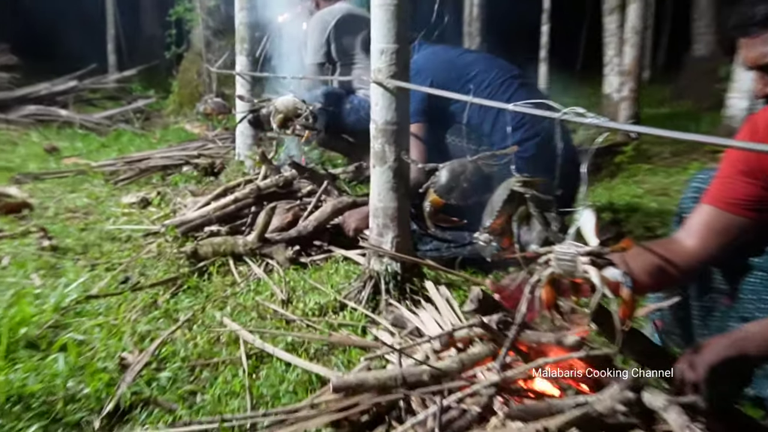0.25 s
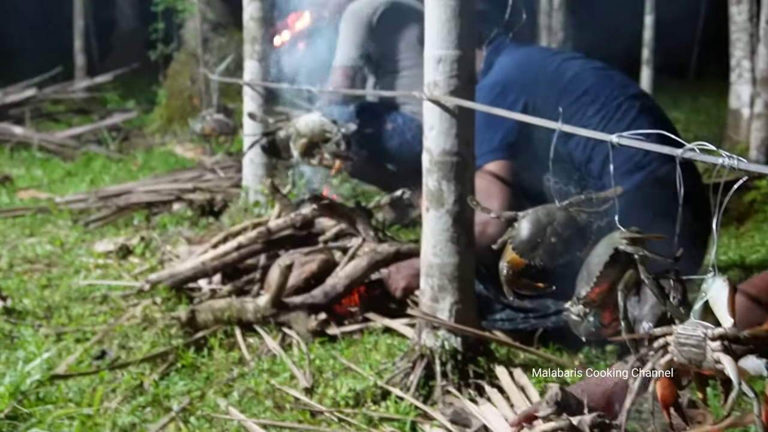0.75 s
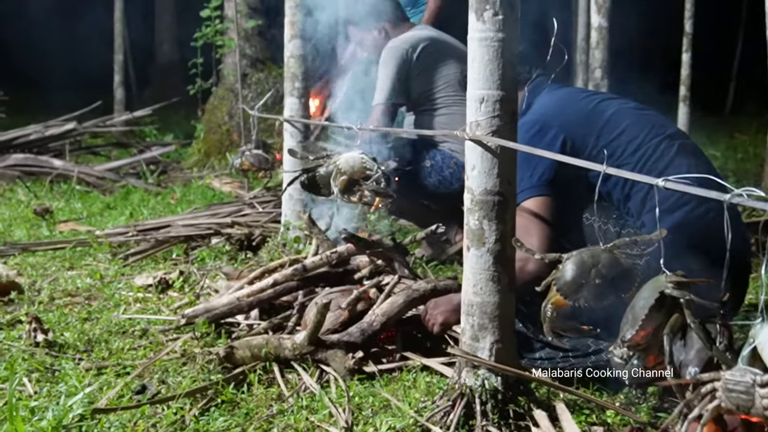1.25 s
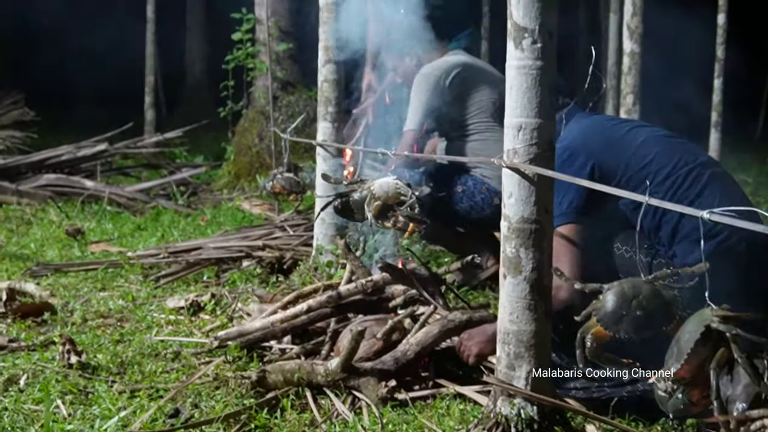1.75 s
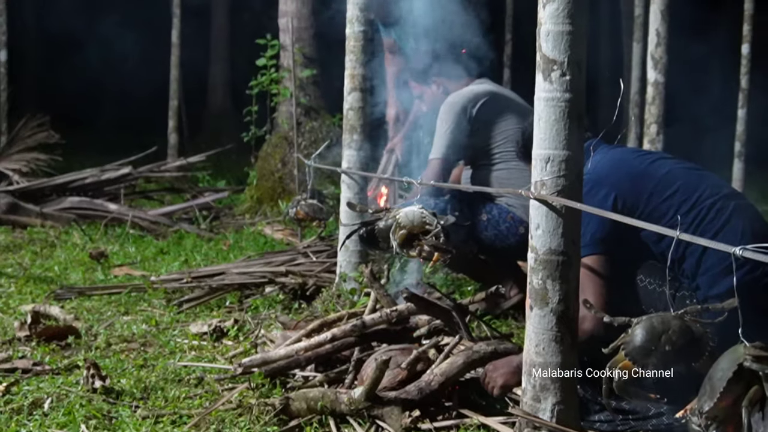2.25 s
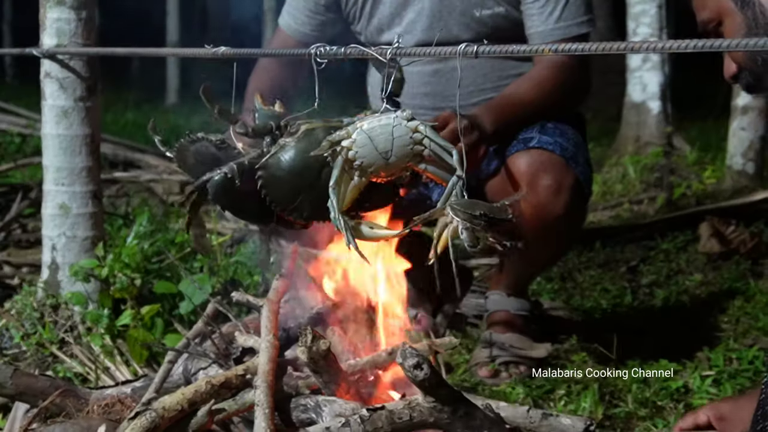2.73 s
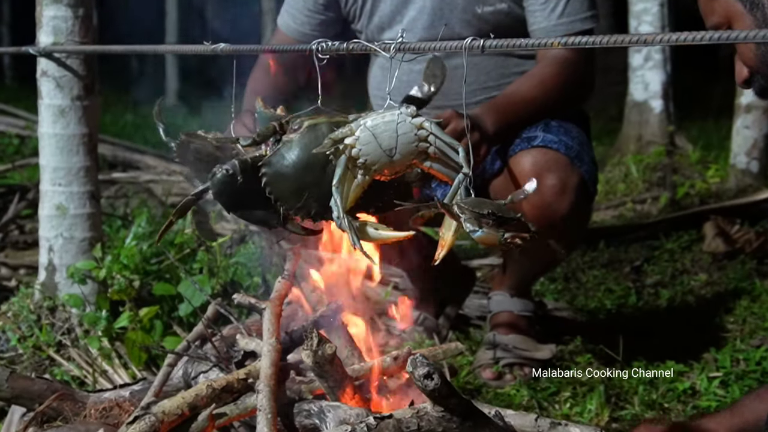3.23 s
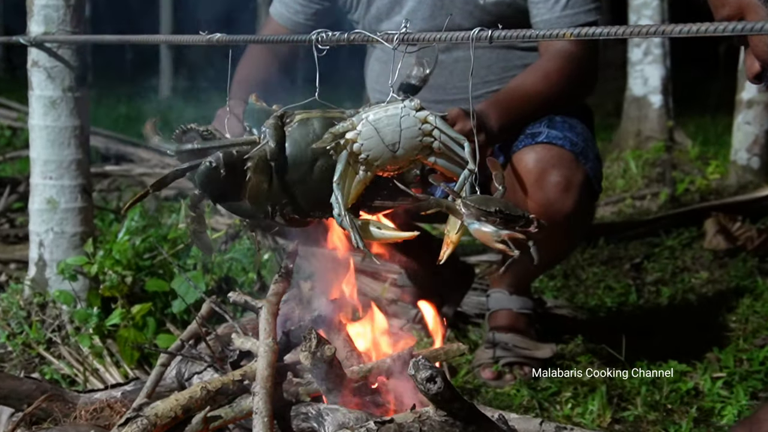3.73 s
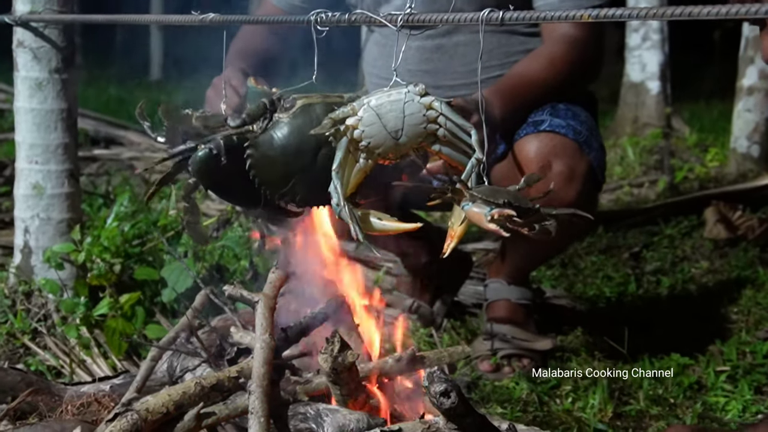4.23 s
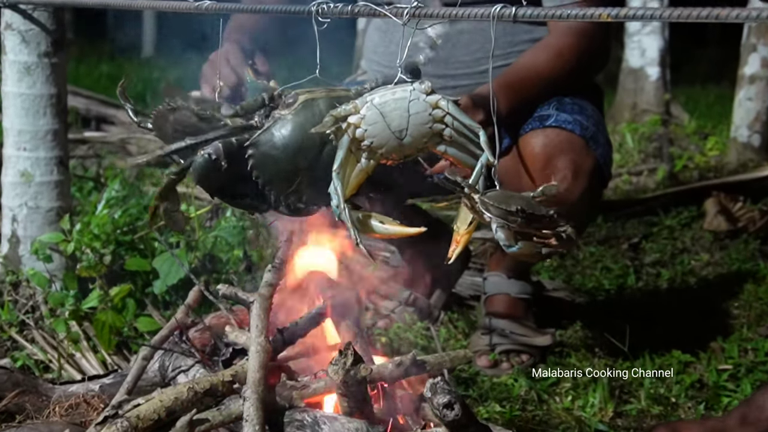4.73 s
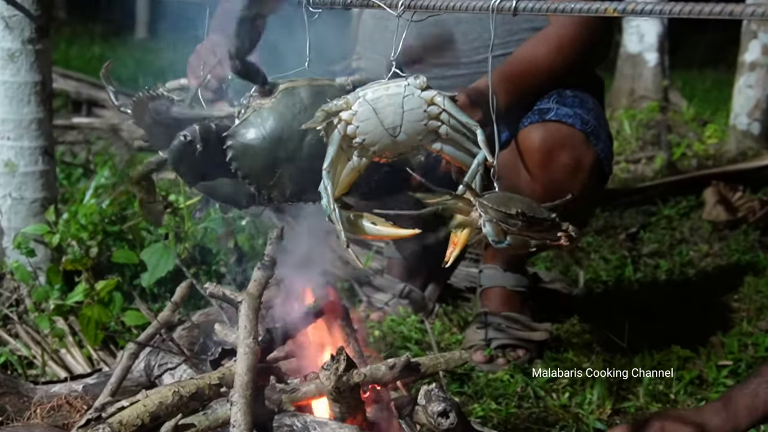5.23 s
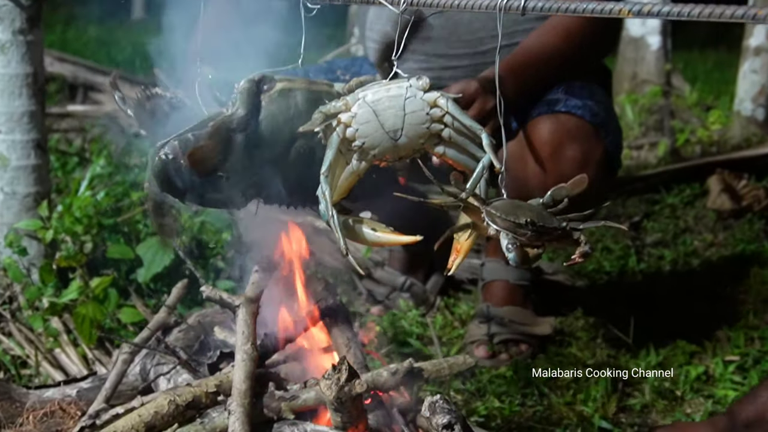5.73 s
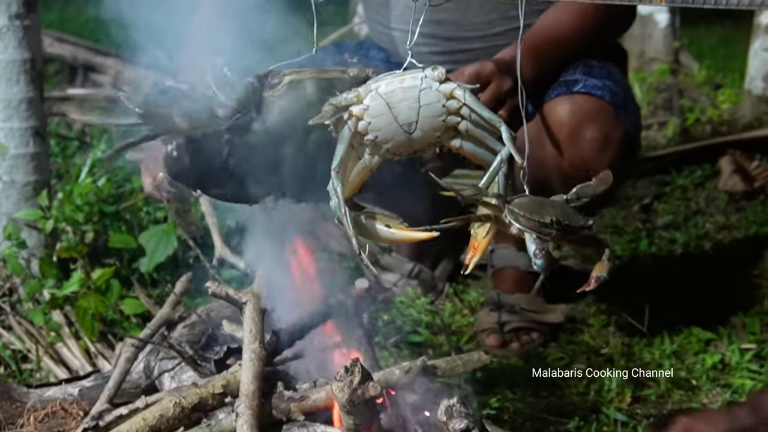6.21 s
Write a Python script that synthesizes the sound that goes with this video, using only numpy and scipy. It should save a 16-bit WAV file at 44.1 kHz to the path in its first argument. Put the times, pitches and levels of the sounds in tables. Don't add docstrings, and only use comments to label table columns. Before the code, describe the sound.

A small fire of sticks and dry fronds burns close to a stereo microphone, outdoors at night. From 0 to 0.7 s a hand rubs the casing with low, woody creaks, as small pops begin and a knock and snap follow around 0.6. Frond rustle continues unevenly; from 1.2 to 2.1 s crackling thickens into crunches, stick knocks, bright ticks and hard snaps, with a crunch at 1.55 and sharp cracks near 2.0. A brief sap hiss comes at 2.26, and soft wheezes near 3.4 in a sparser stretch. Snaps return at 4.2, with the loudest crack at 4.64, then knocks and another big snap at 5.39, thinning towards 6.4. A faint flame rumble stays beneath. Throughout, high crickets trill together, dipping roughly every 0.6 s; a thin bush cricket buzz recurs at that pace. Frogs chirp falling whistles early, at 2.4 and after 5, over a faint distant frog chorus.

```python
import sys
import numpy as np
from scipy import signal
from scipy.fft import rfft, irfft, next_fast_len
from scipy.io import wavfile
from scipy.ndimage import uniform_filter1d

SR = 44100
rng = np.random.default_rng(int(sys.argv[2]) if len(sys.argv) > 2 else 0)


def output_pcm(signal):
    pcm = np.clip(np.atleast_2d(signal).T, -1, 1) * 32767
    wavfile.write(sys.argv[1], SR, np.round(pcm).astype(np.int16))


def boost_factor(decibels):
    exponent = np.asarray(decibels, float) / 20
    return 10 ** exponent


N = 285327
T = np.arange(N) / SR
PORT_LAG = 0.44


def rms_one(x):
    return x / np.sqrt(np.mean(x ** 2) + 1e-20)


def peak_one(x):
    return x / np.abs(x).max()


def in_time(rows):
    s, *columns = np.transpose(rows)
    return [np.interp(T, s, c) for c in columns]


def drift(rate):
    knots = rng.standard_normal(400)
    return rms_one(uniform_filter1d(np.interp(T * rate, np.arange(400), knots), size=200))


def colour(x, spectrum):
    size = next_fast_len(N)
    hz, db = np.transpose(spectrum)
    bins_hz = np.arange(4097) * SR / 8192
    gain = boost_factor(np.interp(np.log(bins_hz + 1), np.log(hz), db))
    cepstrum = irfft(np.log(gain))
    cepstrum[1:4096] *= 2
    cepstrum[4097:] = 0
    response = irfft(np.exp(rfft(cepstrum)))
    return rms_one(irfft(rfft(x, size) * rfft(response, size), size)[..., :N])


def band(x, low_hz, high_hz, order=2):
    return signal.lfilter(*signal.butter(order, [low_hz, min(high_hz, .45 * SR)], "band", fs=SR), x)


def pan(db):
    return boost_factor(np.array([[db / 2], [-db / 2]]))


def spread(mid, side, side_db, pan_db=0):
    return (mid + boost_factor(side_db) * side * [[1], [-1]]) * pan(pan_db)


def add(out, s, sound, pan_db=0, lag=0):
    i = max(round(s * SR), 0)
    pair = sound + lag * np.gradient(sound) * [[1], [-1]]
    out[:, i:i + len(sound)] += pair[:, :N - i] * pan(pan_db)


def grains(per_s, size_db):
    sizes = boost_factor(size_db * np.minimum(rng.exponential(1, (2, N)), 5))
    sizes = sizes * rng.choice([-1, 1], (2, N))
    return rms_one(sizes * (rng.random((2, N)) < per_s / SR))


def far_insects():
    # f/Hz, density/dB per Hz
    night_spectrum = [(6500, -16), (7600, -1.5), (8100, -4), (8800, 5.5), (9900, -2), (11000, -15),
                      (13000, -12.5), (15000, -15), (15900, -48)]
    noise = spread(*rng.standard_normal((2, N)), side_db=-1.0, pan_db=0.5)
    return boost_factor(-44 + 1.6 * drift(9.0)) * colour(noise, night_spectrum)


def chorus_db():
    # rest begins t/s, song returns t/s, depth/dB
    rests = [
        (0.375, 0.527, 4.5),
        (1.093, 1.24, 7),
        (1.773, 1.89, 8.5),
        (2.393, 2.496, 9.5),
        (3.13, 3.23, 7),
        (3.747, 3.857, 6.5),
        (4.366, 4.52, 6.5),
        (4.977, 5.12, 9.5),
        (5.527, 5.678, 7.5),
        (6.096, 6.242, 7),
    ]
    fade_s, return_s = 0.077, .035
    dips = []
    for begin, end, depth_db in rests:
        depth = np.minimum((T - begin) / fade_s, (end - T) / return_s + .5)
        dips.append(depth_db * np.clip(depth, 0, 1))
    return -30.0 - sum(dips)


def crickets(count=4):
    # f/Hz, density/dB per Hz
    wing_spectrum = [(3120, -25), (5300, -18), (5520, -32.5), (5890, 0), (6070, 5), (6500, 7.5), (6880, 2),
                     (7240, -6.5), (7900, -34.5), (10300, -25.5), (17400, -120)]
    near, teeth = np.zeros((2, N)), round(SR / 35)
    for k, pan_db in enumerate(np.linspace(-9.0, 5.0, count)):
        groups_hz = (35.0 + .3 * k) * (1 + .0006 * drift(2.0))
        cycles = np.cumsum(groups_hz) / SR + rng.random()
        tooth = (cycles % 1 * teeth).astype(int)
        file = rng.standard_normal(teeth)[tooth] + .8 * rng.standard_normal(N)
        stroke = np.exp(-3.0 * (7 * cycles % 1))
        throb = 0.43 + np.exp(-4.0 * (cycles % 1))
        near += boost_factor(-2.5 * k) * file * stroke * throb * pan(pan_db)
    far = spread(*rng.standard_normal((2, N)), side_db=-3.0, pan_db=-1.0)
    chorus = colour(rms_one(near) + boost_factor(0.5) * far, wing_spectrum)
    wing_note = rms_one(band(chorus, 6620, 6760))
    return boost_factor(chorus_db() + 2.0) * (chorus + boost_factor(-11.0) * wing_note)


def bush_cricket():
    # t/s, length/s, level/dB, wing resonance f/Hz
    bursts = [
        (.08, .2, -51, 9300),
        (.75, .14, -52, 10000),
        (1.38, .13, -46, 9900),
        (2.03, .13, -48, 9900),
        (2.65, .13, -45, 9900),
        (3.17, .19, -48, 9700),
        (3.81, .19, -47, 9700),
        (4.51, .13, -48, 10100),
        (5.15, .18, -48, 9700),
        (5.79, .19, -49, 9400),
    ]
    out = np.zeros((2, N))
    for s, length, db, hz in bursts:
        t = np.arange(round(length * SR)) / SR
        lines = 352.1 * np.arange(23, 35)[:, None]
        gains = boost_factor(-11.0 * np.abs(lines - hz) / 1000 + rng.normal(0, 2.5, (12, 1)))
        flicker = np.cos(2 * np.pi * (rng.uniform(2, 7, (12, 1)) * t + rng.random((12, 1))))
        waves = np.cos(2 * np.pi * lines * t + rng.normal(0, .6, (12, 1)))
        buzz = np.sum(gains * (.3 + flicker) * waves, axis=0)
        add(out, s, boost_factor(db) * rms_one(buzz) * np.sin(np.pi * t / length) ** .7, pan_db=3.0)
    return out


def chirp(length, start_hz, drop_hz):
    t = np.arange(round(length * SR)) / SR
    hz = start_hz - drop_hz * (1 - (1 - t / length) ** 1.24)
    return np.sin(2 * np.pi * np.cumsum(hz) / SR) * np.sin(np.pi * t / length)


def frogs():
    # t/s, peak level/dB
    calls = [(0.104, -33), (.344, -34), (.54, -41), (1.013, -31), (1.258, -37), (2.431, -35), (5.023, -35),
             (5.075, -29), (5.318, -37), (5.364, -33), (5.631, -38), (5.684, -27)]
    # t/s, level/dB
    far_calls = [
        (0, -48.5),
        (1.5, -44.5),
        (2.8, -50),
        (3.3, -49),
        (3.75, -48.5),
        (4.2, -51),
        (4.9, -50.5),
        (5.8, -44.5),
        (6.47, -52),
    ]
    near = np.zeros((2, N))
    for s, db in calls:
        add(near, s, boost_factor(db) * chirp(0.042, 3480, 520), pan_db=-5.5)
        add(near, s + 0.026, boost_factor(db - 13.5) * chirp(0.0426, 3350, 294), pan_db=7.0)
    starts = spread(*grains(260.0, 0.34), side_db=-7.0)
    far = signal.fftconvolve(starts, chirp(0.0289, 3400, 441)[None])[:, :N]
    return near + boost_factor(in_time(far_calls)[0]) * rms_one(far)


def casing_creaks():
    # t/s, level/dB
    rubbing = [
        (0, -39),
        (.15, -62),
        (.18, -29.5),
        (.26, -45.5),
        (.35, -37.5),
        (.53, -39),
        (.61, -32.5),
        (.645, -40),
        (.69, -43),
    ]
    # f/Hz, width/Hz, level/dB
    resonances = [
        (217, 35, 3.5),
        (391, 73, 6.5),
        (654, 45, -9),
        (1130, 610, -35),
    ]
    # t/s, peak level/dB, f/Hz
    creaks = [(0.019, -27, 390), (0.133, -35.5, 590), (0.175, -24, 218), (0.237, -33, 384),
              (0.293, -33, 401), (0.346, -31, 191), (0.372, -28, 191), (0.392, -36, 357), (0.439, -30, 191),
              (0.497, -30, 393), (0.546, -30, 193), (0.552, -24.5, 497), (0.601, -25, 192),
              (0.621, -19.5, 454)]
    slips = grains(320.0, size_db=3.0)[0]
    modes = [boost_factor(db) * rms_one(band(slips, hz - width / 2, hz + width / 2, order=1))
             for hz, width, db in resonances]
    rub_gain = boost_factor(in_time(rubbing)[0] - 10.5) * (T < rubbing[-1][0])
    out = rub_gain * spread(sum(modes), np.roll(modes[1], 25), side_db=-6.5)
    t = np.arange(3000) / SR
    swell = t / 0.0019 * np.exp(1 - t / 0.0027)
    for s, db, hz in creaks:
        tone = np.sin(2 * np.pi * hz * t) + 0.17 * np.sin(2 * np.pi * 1.85 * hz * t)
        add(out, s, boost_factor(db - 4.0) * swell * tone, pan_db=1.0)
    return out


def flame():
    # f/Hz, density/dB per Hz
    flame_spectrum = [(15, -62), (25, -16), (54, 2.5), (102, 4.5), (158, 5), (361, -11.5), (494, -30),
                      (687, -20), (823, -18), (900, -26), (1170, -41), (1980, -120)]
    flicker_db = .6 * drift(6.0)
    noise = spread(*rng.standard_normal((2, N)), side_db=-70.0)
    rumble = boost_factor(-45.5 + flicker_db) * colour(noise, flame_spectrum)
    distant = rms_one(band(rng.standard_normal(N), 150, 440, order=3))
    return rumble + boost_factor(-65.5) * distant * [[1], [-1]]


def rustle():
    # t/s, level/dB
    vigour = [(0, -37.5), (.35, -33.5), (.5, -39.5), (.8, -31.5), (1.0, -39.5), (1.55, -35), (1.8, -28.5),
              (2.2, -34), (2.55, -31.5), (2.97, -41.5), (4.03, -44.5), (4.3, -34.5), (4.75, -42.5),
              (5.32, -39), (5.58, -37.5), (6.0, -38), (6.25, -41.5), (6.47, -42)]
    # t/s, level/dB
    embers = [(0.0, -53), (0.2, -58), (0.36, -51), (0.49, -47), (0.9, -58.5), (1.13, -58), (1.75, -51),
              (1.89, -43.5), (2.2, -55), (2.54, -46.5), (3.17, -60), (3.48, -51.5), (3.98, -64),
              (4.4, -54.5), (4.81, -47.5), (5.15, -54.5), (5.89, -49.5), (6.47, -55)]
    # f/Hz, density/dB per Hz
    frond_spectrum = [(500, -2), (1000, -4.5), (2000, -0.5), (3500, 2.5), (5500, 2), (8000, -2),
                      (11000, -6.5), (15500, -34)]
    body_db, = in_time(vigour)
    low_db = in_time(embers)[0] + 0.5 * drift(9.0)
    clicks = grains(1500.0 * boost_factor(6.0 * drift(40.0)), size_db=3.0)
    hiss = boost_factor(-15.5) * rng.standard_normal((2, N))
    dealt = rng.integers(0, 8, N)
    rings = []
    for k, hz in enumerate(650 * 1.55 ** np.arange(8)):
        ring = band(clicks * (dealt == k) + hiss, 0.68 * hz, 1.8 * hz, order=1)
        rings.append(ring * boost_factor(3.5 * drift(12.0)) / np.sqrt(hz))
    low = rms_one(sum(rings[:2]))
    body = colour(sum(rings[2:]), frond_spectrum)
    both = boost_factor(body_db - 1.0) * body + boost_factor(low_db + 1.36) * low
    return spread(*both, side_db=-23.0, pan_db=-1.0)


def crunches():
    # t/s, rise/s, fall/s, level/dB, centre f/Hz
    collapses = [(0.662, 0.023, 0.012, -25.5, 3400), (1.325, 0.012, 0.013, -25, 2340),
                 (1.391, 0.0027, 0.017, -21, 2960), (1.557, 0.018, 0.0093, -13.5, 2800),
                 (1.889, 0.0041, 0.021, -21, 3020), (2.91, 0.0044, 0.034, -30, 2800),
                 (4.489, 0.0061, 0.0091, -25.5, 2670), (4.639, 0.011, 0.008, -16, 2900),
                 (5.051, 0.02, 0.012, -31, 3450), (5.505, 0.026, 0.01, -23.5, 2290),
                 (6.143, 0.05, 0.02, -35.5, 1990), (1.555, 0.026, 0.022, -31.5, 530),
                 (1.35, 0.052, 0.044, -45.5, 400), (2.961, 0.063, 0.054, -48, 560),
                 (4.64, 0.0092, 0.022, -40.5, 199)]
    # t/s, rise/s, fall/s, level/dB, centre f/Hz
    wheezes = [
        (.625, 0.015, 0.014, -34, 756),
        (2.262, 0.017, 0.021, -26, 4200),
        (2.262, 0.023, 0.027, -39, 1200),
        (3.29, 0.013, 0.05, -41, 1820),
        (3.403, 0.0023, .028, -28.5, 1950),
        (3.41, .004, 0.034, -36, 3150),
        (3.41, 0.0057, 0.082, -45.5, 880),
        (3.435, 0.014, 0.033, -34, 1840),
        (6.14, 0.033, 0.0095, -37.5, 690),
    ]
    out, t = np.zeros((2, N)), np.arange(-4000, 8000) / SR
    splinters = grains(5000.0, size_db=2.2)[0]
    rows = [(*row, 2.08) for row in collapses] + [(*row, 0.37) for row in wheezes]
    for k, (s, rise, fall, db, hz, octaves) in enumerate(rows):
        piece = np.roll(splinters, -k * len(t))[:len(t)]
        half = 2 ** (octaves / 2)
        sound = rms_one(band(piece, hz / half, hz * half))
        sound += boost_factor(-42.0) * rms_one(band(piece, 4100, 18000))
        swell = np.exp(np.where(t < 0, t / rise, -t / fall))
        add(out, s + t[0], boost_factor(db) * sound * swell, pan_db=0.6)
    return out


def knocks():
    # t/s, peak level/dB, ring f/Hz
    stick_knocks = [(0.716, -18, 1800), (1.229, -25, 1680), (1.312, -14.5, 1310), (1.391, -27, 1110),
                    (1.541, -17.5, 1170), (1.811, -12, 1900), (1.837, -17, 1330), (1.869, -13.5, 1830),
                    (1.886, -20, 1680), (2.108, -32, 1720), (3.145, -19, 1930), (0.622, -7.5, 1940),
                    (3.797, -22, 1600), (4.076, -22.5, 1850), (4.484, -37, 1490), (0.5553, -12.5, 2160),
                    (4.639, -36, 1540), (4.709, -18, 1390), (4.922, -13.5, 1450), (4.951, -17, 1580),
                    (5.015, -19.5, 1690), (5.016, -22, 1050), (5.06, -16, 1570), (5.118, -11.5, 2020),
                    (5.252, -25.5, 1060), (5.392, -7, 1190), (5.422, -13.5, 1510), (5.475, -12, 1360),
                    (6.013, -18.5, 1060), (6.068, -18, 1800)]
    # t/s, peak level/dB, ring f/Hz
    hollow_thuds = [(1.329, -28, 940), (1.37, -42, 1200), (1.526, -29, 1090), (1.612, -30, 615),
                    (1.688, -33, 673), (1.87, -35, 616), (1.887, -29.5, 626), (2.937, -31, 1170),
                    (3.006, -35, 404), (3.144, -40, 999), (3.715, -33, 1110), (4.277, -36.5, 464),
                    (4.634, -29, 1100), (5.043, -28.5, 1150), (5.061, -32, 670), (5.489, -17.5, 1130),
                    (5.566, -37, 655), (5.667, -30, 1020), (5.791, -34, 794), (6.439, -32, 1130)]
    out, t = np.zeros((2, N)), np.arange(1000) / SR
    blows = stick_knocks + [(s, db + 8.0, hz) for s, db, hz in hollow_thuds]
    for (s, db, hz), noise in zip(blows, rng.standard_normal((len(blows), len(t)))):
        knock = peak_one(band(noise * np.exp(-t / 0.0038), 0.7 * hz, 1.24 * hz))
        add(out, s, boost_factor(db - 9.0) * knock, pan_db=3.0 * noise[-1], lag=1.6 * noise[-2])
    return out


def burst_envelopes():
    t = np.arange(1000) / SR
    crack = np.exp(-t / 0.00004)
    crack = crack - boost_factor(-13.5) * np.roll(crack, round(.0011 * SR))
    tail = boost_factor(-23.0) * np.exp(-t / 0.0035)
    return crack, tail


def ticks():
    # t/s, peak level/dB, centre f/Hz
    thin_bursts = [(0.4683, -24, 8810), (0.6424, -20, 8200), (1.2284, -22, 7380), (1.296, -25, 7320),
                   (1.3128, -15, 8540), (1.3907, -30, 9890), (1.5254, -26, 8590), (1.5514, -16, 7890),
                   (1.5554, -20, 8820), (1.577, -19, 9440), (1.6756, -19, 7450), (1.7654, -27, 7370),
                   (1.7807, -14.5, 8150), (1.8233, -17, 7600), (1.8387, -12, 7860), (1.8851, -12, 7510),
                   (1.8964, -25, 8550), (1.969, -17, 7420), (1.9899, -11.5, 7500), (2.0154, -4, 8010),
                   (2.2812, -21, 7890), (2.353, -17, 9240), (2.445, -19, 8610), (2.7337, -16, 7460),
                   (2.7422, -19, 8590), (3.05, -29, 7300), (3.0674, -36, 7350), (3.1702, -28, 9500),
                   (3.4226, -25, 9170), (3.4515, -16, 7390), (3.474, -23, 7560), (3.488, -16, 7400),
                   (3.5194, -32, 7350), (3.5986, -13.5, 7800), (3.6985, -30, 8160), (3.7155, -20.5, 9200),
                   (4.026, -21, 7450), (4.0632, -27, 7360), (4.2647, -19, 7320), (4.2802, -19, 7770),
                   (4.2914, -21, 7300), (4.327, -27, 7300), (4.334, -25, 9680), (4.4603, -33, 7430),
                   (4.486, -21, 8800), (4.6159, -21, 8030), (4.6254, -20, 8470), (4.6359, -12, 8510),
                   (4.9954, -20, 7300), (5.062, -20, 7350), (5.094, -22, 7630), (5.3906, -15.5, 7300),
                   (5.4762, -10, 7600), (5.5653, -28, 7550), (5.6057, -21, 7790), (5.6471, -32, 7360),
                   (5.7534, -19, 7300), (5.7622, -9.5, 8500), (5.8292, -23, 9490), (6.1399, -22, 8340)]
    out, (crack, tail) = np.zeros((2, N)), burst_envelopes()
    for (s, db, hz), noise in zip(thin_bursts, rng.standard_normal((len(thin_bursts), len(crack)))):
        tick = band((1 + 0.17 * noise) * crack + 1.1 * noise * tail, 0.73 * hz, 1.34 * hz)
        lag = PORT_LAG * (1 + 0.91 * noise[-2])
        add(out, s + .0008, boost_factor(db + 4.4) * peak_one(tick), pan_db=3.5 + 1.1 * noise[-1], lag=lag)
    return out


def snaps():
    # t/s, peak level/dB, ring f/Hz
    pitched_snaps = [(0.672, -9.5, 3730), (1.1657, -18, 3500), (1.2291, -11.5, 4820), (1.3185, -16, 3060),
                     (1.3287, -14.5, 2250), (1.525, -19, 3440), (1.5406, -11, 2060), (1.5538, -4, 3070),
                     (1.582, -15, 4250), (1.6141, -12.5, 4080), (1.691, -18, 3890), (1.764, -23, 4890),
                     (1.7794, -9.5, 4420), (1.799, -18, 5290), (1.8156, -15, 2390), (1.823, -9, 3630),
                     (1.839, -9, 4870), (1.8527, -18, 2080), (1.869, -11, 4190), (1.8863, -6.5, 3720),
                     (1.8954, -19, 4050), (1.9912, -5, 4610), (2.0167, -6.5, 3420), (2.1608, -21.5, 3070),
                     (2.2807, -13, 4450), (2.3544, -23, 4030), (2.7342, -17, 5160), (3.051, -24, 3170),
                     (3.171, -29, 3250), (3.4754, -26, 3830), (3.5473, -37, 5430), (3.6994, -26, 3060),
                     (3.717, -15, 3570), (4.2369, -12, 2360), (4.281, -11, 4150), (4.291, -13, 3710),
                     (4.3278, -11.5, 5010), (4.3344, -22, 4440), (4.4356, -30, 2230), (4.4615, -15, 4290),
                     (4.4876, -11, 2970), (4.573, -23, 4480), (4.6064, -25, 3600), (4.6203, -19, 4480),
                     (4.6374, 2.5, 3550), (4.6494, -24, 4730), (4.6594, -27, 2530), (5.0948, -25, 3120),
                     (5.183, -30, 3070), (5.3815, -25, 3310), (5.3914, -1.5, 3360), (5.475, -13.5, 2800),
                     (5.4939, -18, 3740), (5.648, -11, 4600), (5.7538, -25, 3920), (5.7648, -19, 3100),
                     (5.83, -18, 5550), (5.848, -21, 3010), (6.1402, -18.5, 2160)]
    # t/s, peak level/dB
    common_pitch_snaps = [(0.189, -21), (0.235, -19), (0.2816, -23), (3.9663, -42), (3.9837, -25), (1.1883, -23),
                          (1.3134, -18), (1.387, -16), (1.517, -16), (1.6895, -27), (1.9696, -18), (2.2503, -30),
                          (2.446, -16.5), (2.4675, -16.5), (2.6614, -22), (2.9026, -13.5), (2.932, -20),
                          (3.246, -42), (3.49, -22), (3.601, -17), (4.0262, -23), (4.222, -17.5), (4.2656, -24),
                          (4.518, -19.5), (5.0424, -27), (5.0615, -18), (5.5663, -18), (6.2728, -25), (6.44, -20),
                          (6.449, -17)]
    out, (crack, tail) = np.zeros((2, N)), burst_envelopes()
    bursts = pitched_snaps + [(s, db + 1.0, 3500) for s, db in common_pitch_snaps]
    for (s, db, hz), noise in zip(bursts, rng.standard_normal((len(bursts), len(crack)))):
        pop = band((1 + .3 * noise) * crack + noise * tail, 0.8 * hz, 1.41 * hz)
        add(out, s, boost_factor(db + 2.0) * peak_one(pop), pan_db=-0.5 + 0.54 * noise[-1], lag=PORT_LAG)
    return out


def scene():
    surroundings = far_insects() + crickets() + bush_cricket() + frogs()
    fire = flame() + rustle() + crunches() + knocks() + ticks() + snaps()
    return surroundings + casing_creaks() + fire


def top_cut(x):
    return signal.sosfilt(signal.butter(12, 15910, fs=SR, output="sos"), x)


def record(dry):
    low_pass = signal.cheby2(12, 60, 16000, fs=SR, output="sos")
    mix = signal.sosfilt(low_pass, np.clip(dry, -1, 1))
    return top_cut(mix)


dry = scene()
out = record(dry)
output_pcm(out)
```